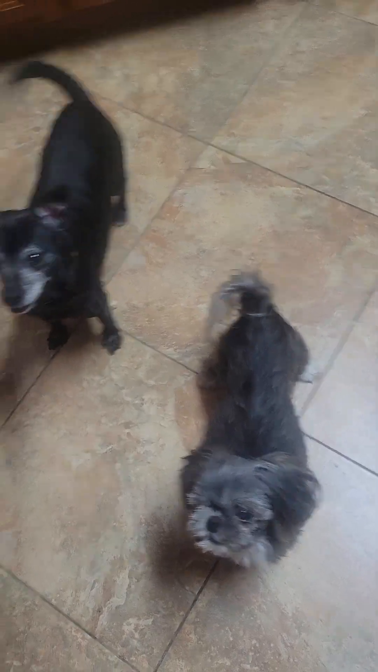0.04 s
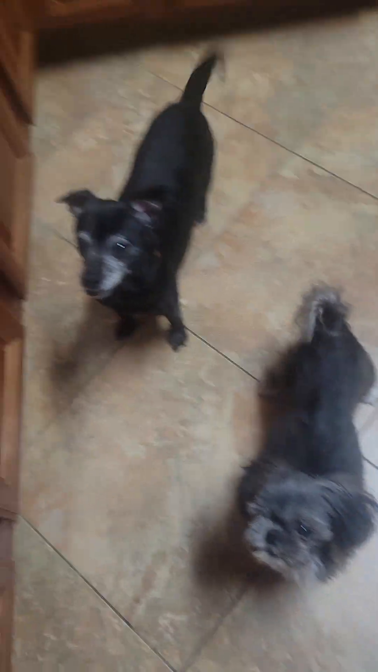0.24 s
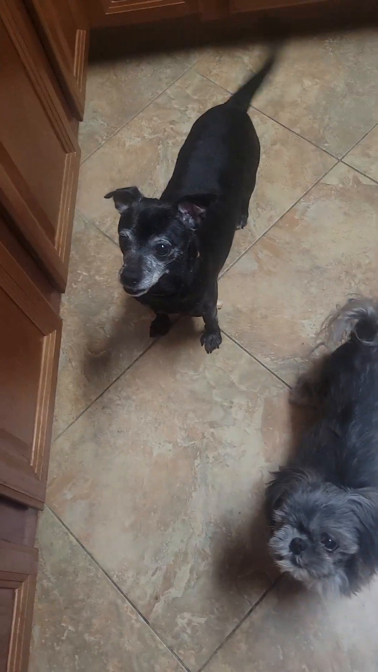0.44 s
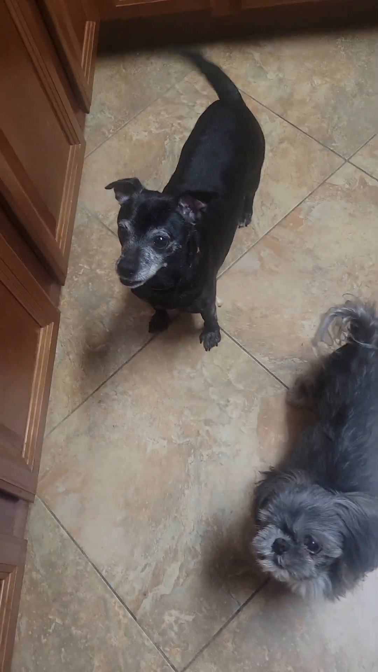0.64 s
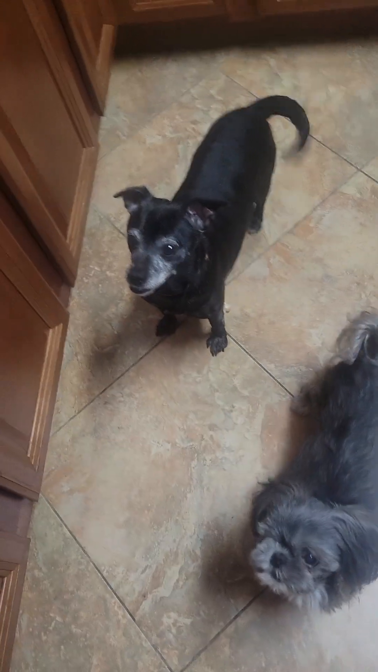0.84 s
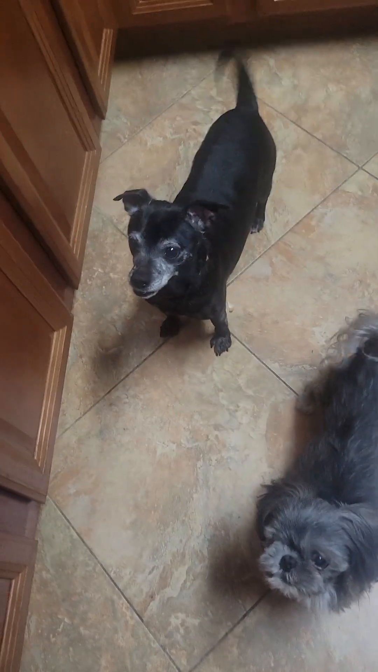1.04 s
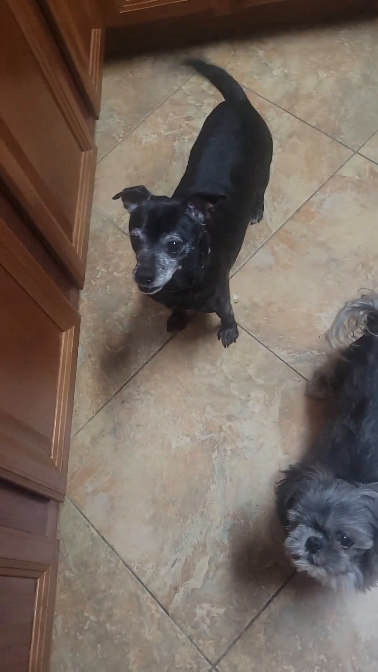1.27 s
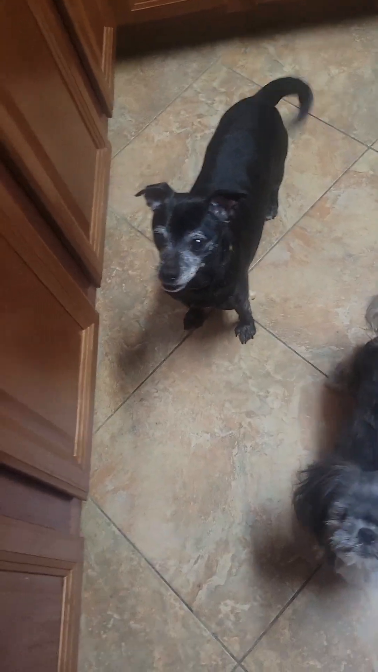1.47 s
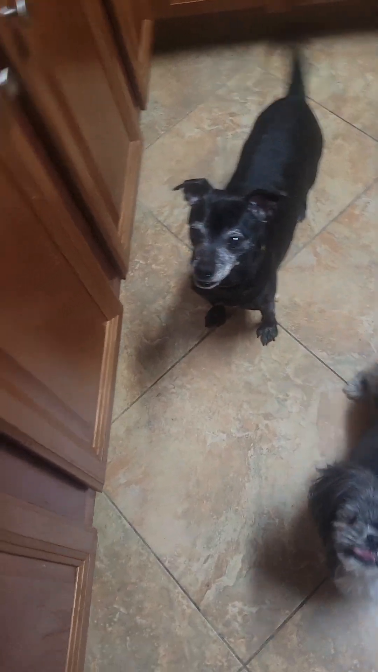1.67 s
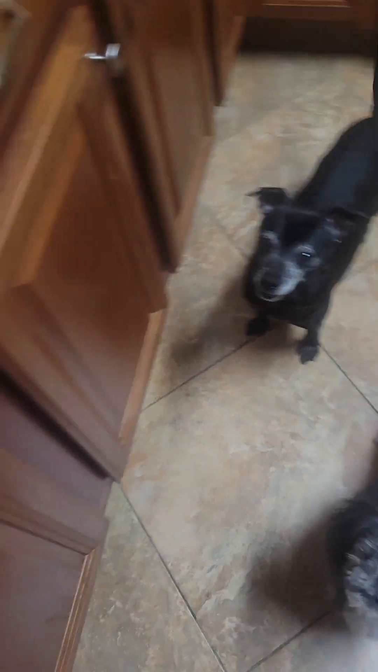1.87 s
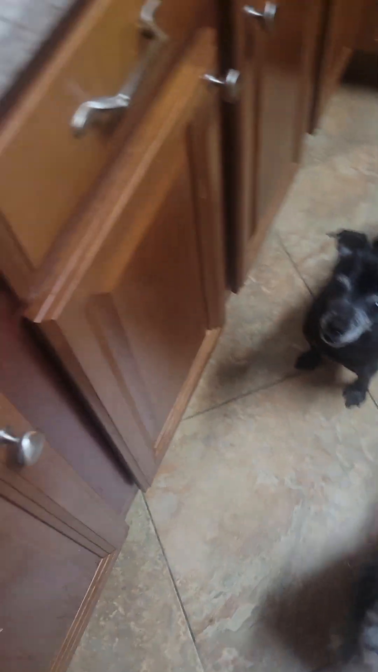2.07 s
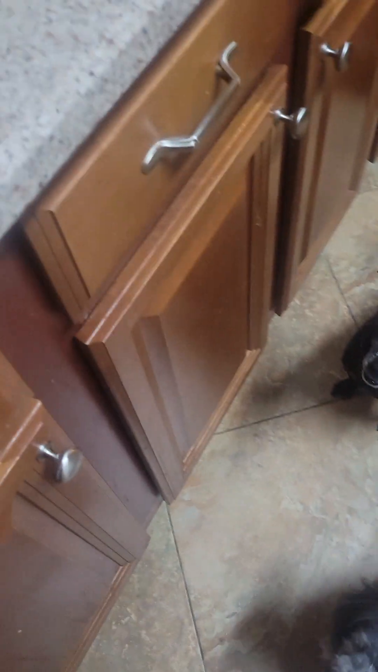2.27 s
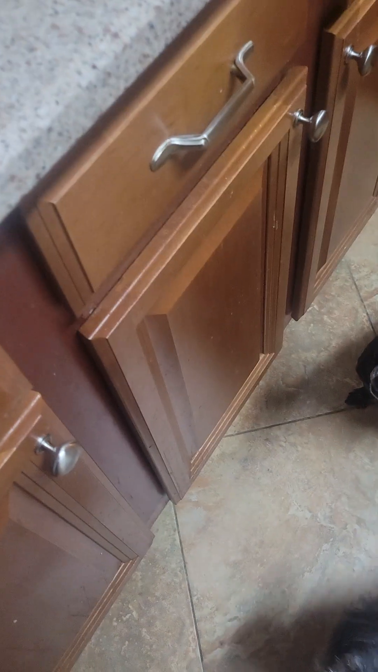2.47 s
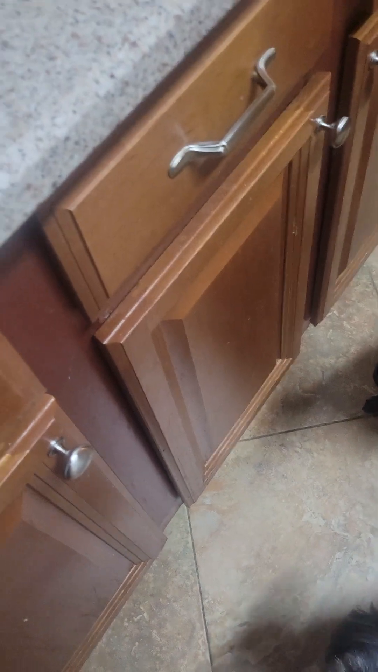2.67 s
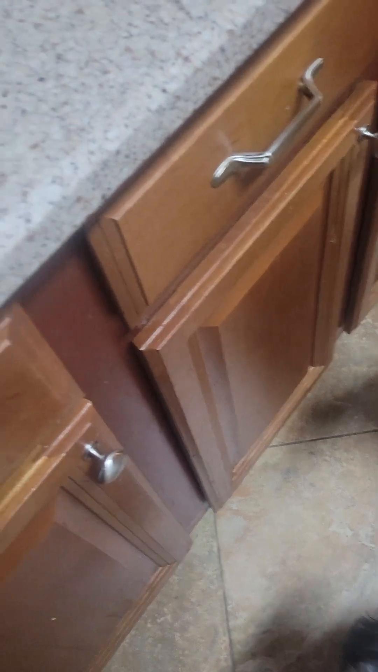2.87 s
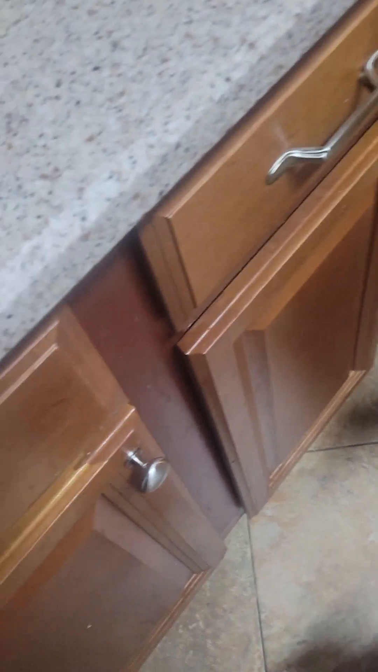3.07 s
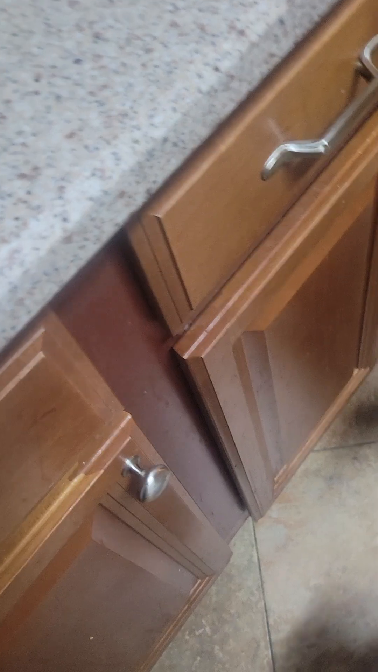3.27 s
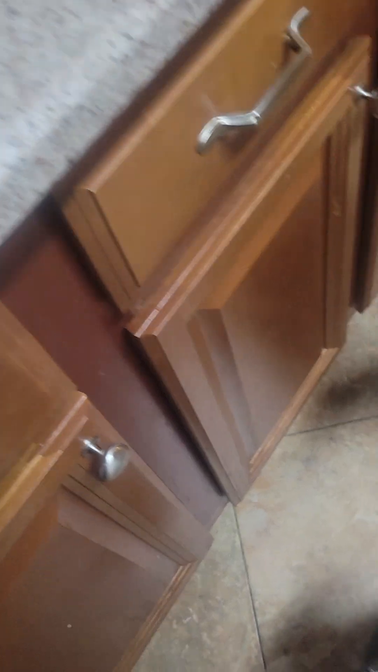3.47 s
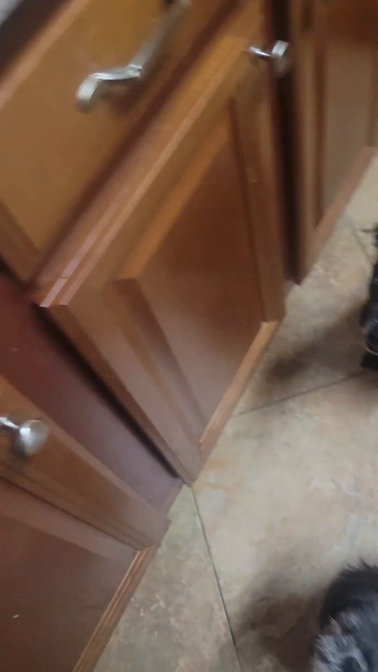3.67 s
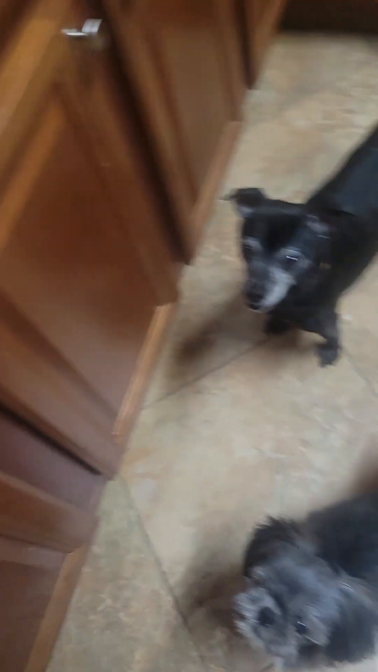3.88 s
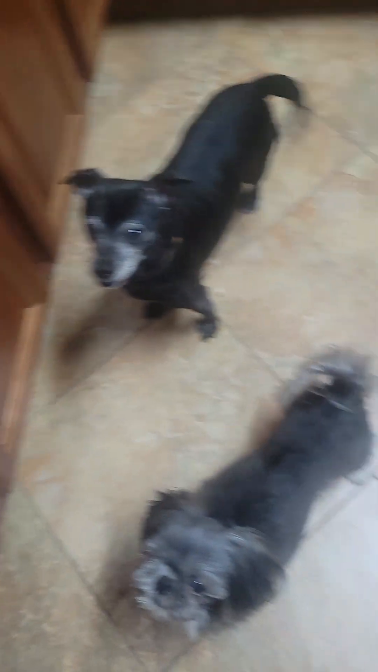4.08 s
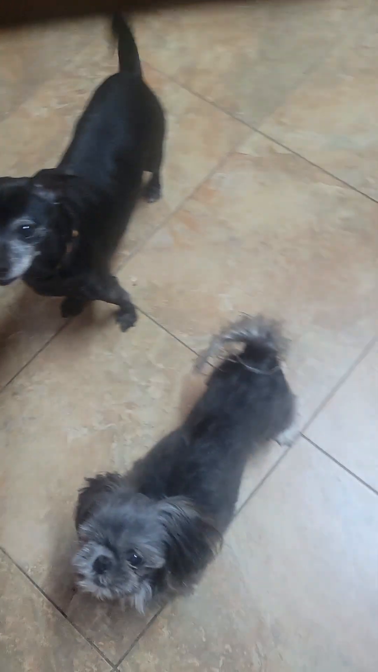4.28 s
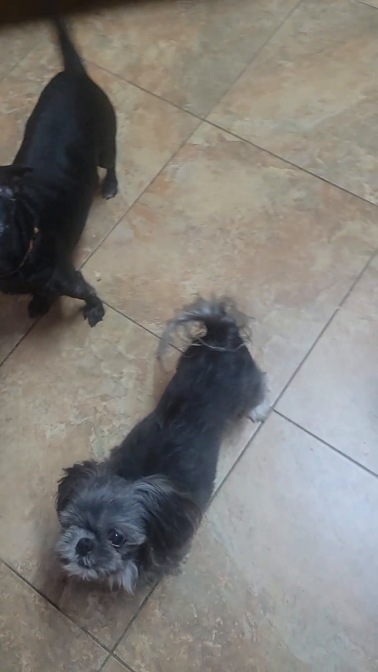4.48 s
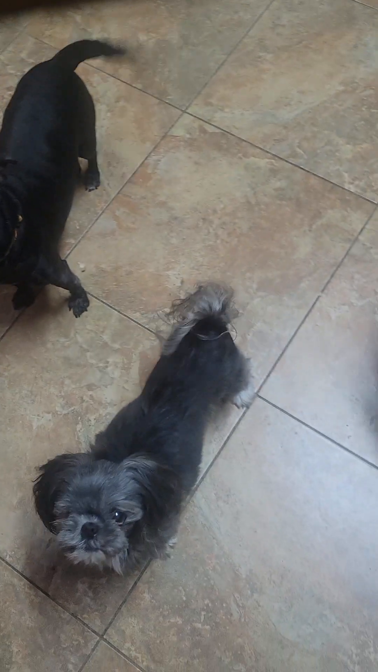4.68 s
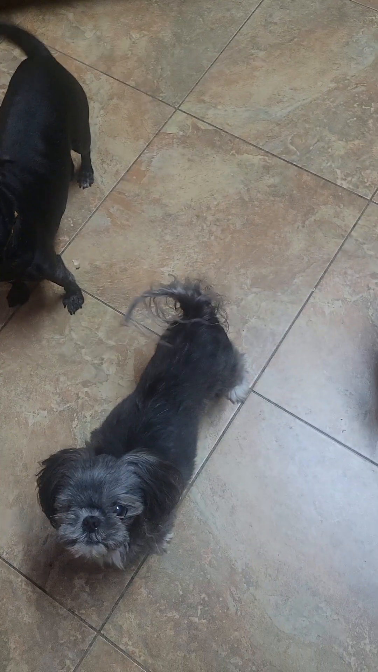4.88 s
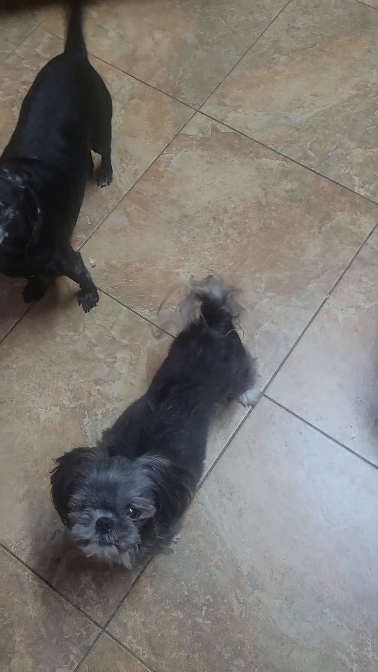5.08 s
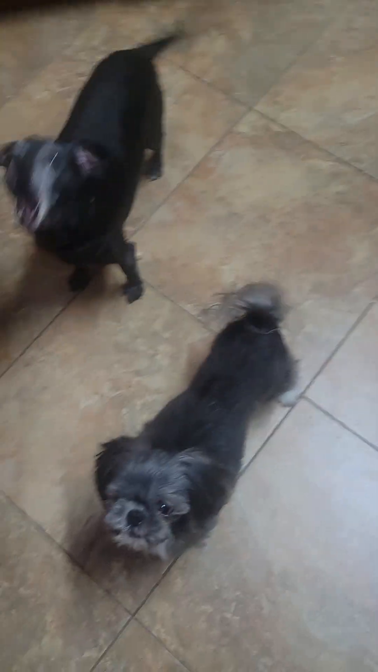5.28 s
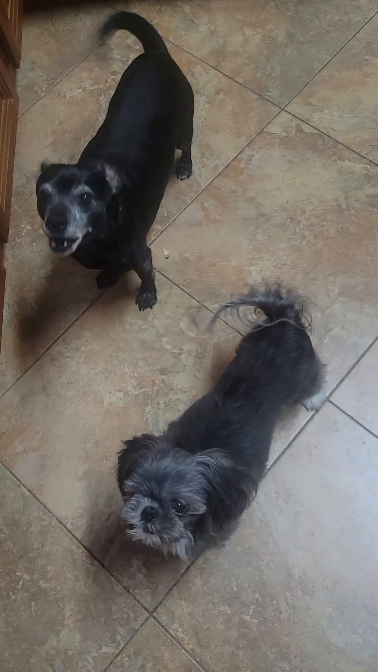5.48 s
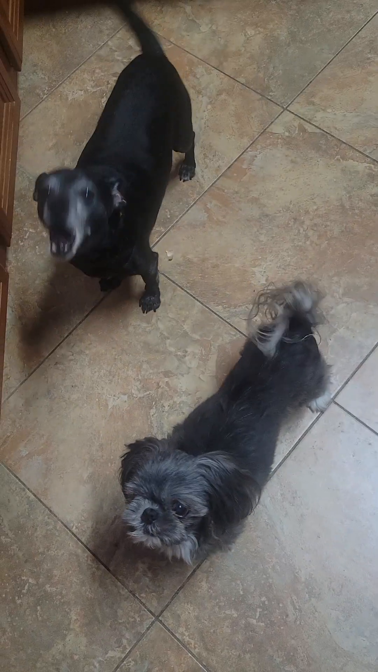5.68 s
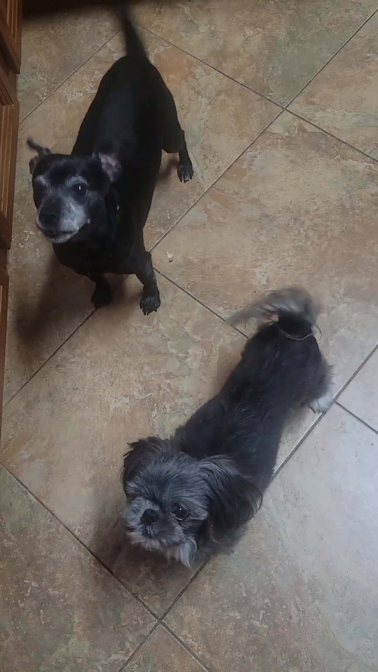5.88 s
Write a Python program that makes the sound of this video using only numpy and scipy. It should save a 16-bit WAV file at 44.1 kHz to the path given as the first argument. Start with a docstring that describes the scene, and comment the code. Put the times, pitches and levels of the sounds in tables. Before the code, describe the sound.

In a tiled kitchen, close to a phone, a soft low knock comes first, then light claw clicks scattered over a quiet hum. Around the middle paws scuffle and land in a quick flurry, with thin nasal whines and another firm patter. Near the end a small dog barks twice, short, high and rough, with a tiny gasp between and a bright room ring.

```python
"""A small dog barks twice in a tiled kitchen, close to a phone: rough voiced tones through a throat filter, with breath.
Before that, claws tick on the tiles as clicks of treble noise, something knocks softly as damped tones,
and paws scrabble and land as shaped noise. A thin nasal whine, a gliding sine, comes and goes.
Below lie an appliance hum of narrow noise bands, room hiss and a thin treble rustle."""
import sys
import numpy as np
from scipy import signal
from scipy.fft import rfft, irfft, next_fast_len
from scipy.io import wavfile
from scipy.ndimage import map_coordinates

SR = 44100
rng = np.random.default_rng(int(sys.argv[2]) if len(sys.argv) > 2 else 0)


def output_pcm(signal):
    """Save a mono or channel-first signal as 16-bit PCM at the path in sys.argv[1].

    Samples are clipped to [-1, 1] before scaling.
    """
    pcm = np.clip(np.atleast_2d(signal).T, -1, 1) * 32767
    wavfile.write(sys.argv[1], SR, np.round(pcm).astype(np.int16))


N = 261513

# The pitch and drive of each bark. One list per bark; each row: time in seconds, pitch in Hz,
# drive of the voice in dB ahead of the throat.
BARK_CONTOURS = [
    [(5.298, 895.7, -59), (5.308, 944.7, -56), (5.316, 838, -21), (5.328, 982.5, -29.5),
     (5.348, 1064, -24.5), (5.358, 913, -35), (5.372, 972, -29), (5.392, 1063, -23), (5.409, 957, -24.5),
     (5.422, 813, -25), (5.436, 540, -49.5)],
    [(5.72, 800, -47.5), (5.74, 938, -32), (5.752, 1007, -26), (5.762, 853, -24.5), (5.775, 868, -20.5),
     (5.790, 927, -29), (5.812, 1040, -23), (5.833, 1022, -22), (5.848, 821, -28), (5.861, 620, -40),
     (5.876, 488, -40)],
]
# The mix inside each bark. Each row: second tone in dB against the voice, breath at full pitch in dB against
# the drive, time before the half pitch drops out in seconds, depth of the quarter pitch (0-1),
# share of narrow-mouth breath (0-1).
BARK_BLEND = [(-1.5, 5.5, 0.0675, 0.37, 0.21), (-15, -1, 0.0308, 0.78, 0.91)]
# Throat and mouth resonances. Each row: frequency in Hz, gain in dB.
THROAT_GAIN = [(90, -39), (200, 9.5), (320, 14), (500, 9.5), (800, 12), (1150, 19), (1400, 9.5), (1950, 1),
               (2400, -24), (3100, -20.5), (6000, -32), (16000, -75)]
# Colour of breath through the open mouth. Each row: frequency in Hz, relative level in dB per Hz.
OPEN_BREATH = [(1180, -29.5), (2000, -6.5), (2690, -5), (2930, -29), (5390, -8.5), (5930, -23.5),
               (7060, -11), (7840, -19), (8850, -17.5), (9830, -24.5), (16000, -38)]
# Colour of breath through a narrower mouth. Each row: frequency in Hz, relative level in dB per Hz.
NARROW_BREATH = [(1180, -23.5), (1800, 0.5), (3300, -23), (4300, -0.5), (5000, -7), (5800, -24),
                 (6500, -10), (7700, -14.5), (8750, -11), (9830, -14.5), (16000, -25)]
HALF_CLOSED_S, CLOSE_OVER_S = 0.031, 0.064  # the mouth is half closed this long before the end; whole move
HALF_DIES_S = .008  # slope of the half pitch's drop-out
HOARSE, CLEAR = .09, .02  # roughness with the mouth open (before half pitch adds to it) and closed
SECOND_HZ, SECOND_FADES_DB = 1168, 17  # centre of the second tone, and its drop as the mouth closes
SECOND_JOINS_S, SECOND_JOIN_DB = 0.066, 18  # the second tone climbs by this much early in the bark
BREATH_DB_PER_OCTAVE, OPEN_HZ = 27, 974  # breath sinks when the pitch is below OPEN_HZ
BREATH_FADES_DB = 23  # less breath as the mouth closes


def barks():
    """Vocal folds near 1 kHz that slip into half pitch beside a second steady tone, with breath noise."""
    out, t = np.zeros(N), np.arange(N) / SR
    for rows, (second_re_db, air_db, half_s, quarter, narrow) in zip(BARK_CONTOURS, BARK_BLEND):
        start_s, joins_s, end_s = rows[0][0], rows[1][0], rows[-1][0]
        hz, voice_db, gate = curves(rows)
        closed = np.clip((t - end_s + HALF_CLOSED_S) / CLOSE_OVER_S + .5, 0, 1)
        half = np.clip(1 - (t - start_s - half_s) / HALF_DIES_S, .1, 1) * (1 - closed)
        rough = HOARSE * (1 + half) + (CLEAR - HOARSE) * closed

        not_joined = np.clip(1 - (t - joins_s) / SECOND_JOINS_S, 0, 1)
        second_db = second_re_db - SECOND_FADES_DB * closed - SECOND_JOIN_DB * not_joined
        second = amp(second_db) * np.cos(phase(SECOND_HZ * (1 + .011 * wobble(80))))

        turns = phase(hz * (1 + .12 * rough * wobble(200)))
        folds = np.zeros(N)
        for k in range(1, 10):
            octave_growth = 1 + closed * (k == 2)  # the octave grows as the mouth closes
            # soft pulses: the overtones do not peak together
            folds += octave_growth * np.cos(k * turns + .6 * k * k)
        # strong and weak cycles alternate
        folds *= 1 + 1.35 * half * np.cos(turns / 2)
        folds *= 1 + quarter * half * np.cos(turns / 4)
        # the two tones mix into a low difference tone and sidebands
        folds = folds * (1 + .5 * second) + second
        folds *= 1 + .7 * rough * wobble(400)  # uneven cycles
        voice = filtered(folds * amp(voice_db) * gate, lambda f: amp(along(THROAT_GAIN, f)))

        octaves_below = np.minimum(np.log2(hz / OPEN_HZ), 0)
        breath_db = voice_db + air_db - BREATH_FADES_DB * closed + BREATH_DB_PER_OCTAVE * octaves_below
        share = np.clip(narrow + (1 - narrow) * closed, 0, 1)
        air = np.sqrt(1 - share) * noise(OPEN_BREATH) + np.sqrt(share) * noise(NARROW_BREATH)
        out += voice + amp(breath_db + 0.64 * wobble(500)) * gate * air
    return out


# The intake between barks. One row: start in seconds, length in seconds, level in dB.
GASP_MOMENT = (5.635, 0.03, -36.5)
# Colour of the indrawn air. Each row: frequency in Hz, relative level in dB per Hz.
GASP_COLOUR = [(2000, -1), (3500, -7.5), (6500, -2.5), (9500, -8), (12000, -43)]


def gasp():
    """The dog draws air between barks: a short swell of coloured noise."""
    return swell(*GASP_MOMENT, .1, .1) * noise(GASP_COLOUR)


# Nasal whines. Each row: start in seconds, length in seconds, starting pitch in Hz, glide in Hz per second,
# starting level in dB.
WHINE_NOTES = [(3.78, .21, 1760, -100, -61), (4.22, .13, 2030, 200, -66), (4.91, .29, 2030, -430, -58.5)]
WHINE_SAGS_DB_PER_S = 18


def whines():
    """A thin, slightly unsteady whistle through the nose: a gliding sine that sags in level."""
    out = np.zeros(N)
    for s, length, start_hz, glide, db in WHINE_NOTES:
        since = np.clip(np.arange(N) / SR - s, 0, length)
        hz = (start_hz + glide * since) * (1 + .012 * wobble(120))
        level = swell(s, length, db, .15, .2) * amp(3 * wobble(60) - WHINE_SAGS_DB_PER_S * since)
        out += level * np.sin(phase(hz))
    return out


# Claws on tile. Each row: start in seconds, level in dB before the trim, mid-range in dB against the click.
CLAW_TICKS = [(0.607, -58, -20), (1.0824, -53.5, 14), (1.145, -34, -9), (1.384, -45, 1), (1.561, -47, -13),
              (1.639, -36, -35), (1.788, -57.5, 13.5), (1.818, -40, -23), (1.8498, -46, -10),
              (1.903, -63.5, 22.5), (2.0271, -36.5, -36), (2.2408, -32.5, -30), (2.283, -50, -32),
              (2.4972, -33, -39), (2.616, -53.5, 8), (2.689, -37.5, -8), (2.809, -48, 0),
              (2.9677, -33.5, -16.5), (3.154, -34.5, -16.5), (4.9248, -40, -14), (4.957, -43, 13.5),
              (5.012, -34, -26), (5.102, -54.5, 16.5), (5.6064, -36.5, 15)]
# Bright claw colour, shared with the rustle. Each row: frequency in Hz, relative level in dB per Hz.
CLAW_COLOUR = [(1470, -54), (2500, -32), (5200, -6), (8330, -3.5), (9220, -8), (11000, -4.5), (13000, -5.5),
               (16000, -8)]
SECOND_CLAW_S = 0.0077  # a second claw lands after the first


def ticks(tracks):
    """Claws strike hard tile: paired bright clicks with a short tail and a mid-range tap."""
    size = SR // 8
    t = np.arange(size) / SR
    for s, db, mid_db in CLAW_TICKS:
        first = 1.9 * dies(t, .018, .001)
        second = rng.uniform(.6, 1.6) * np.roll(dies(t, .022, .001), round(SECOND_CLAW_S * SR))
        clicks = first + second + .25 * dies(t, .13, .004)
        # the claw chatters as it slips: a new level every 60 samples
        chatter = amp(5.2 * np.repeat(rng.standard_normal(size // 60 + 1), 60)[:size])
        sharp = noise(CLAW_COLOUR, size) * clicks * chatter
        mid = noise([(250, -20.5), (600, -26.5), (3000, -23.0), (5000, -46.0)], size)
        mid *= dies(t, 0.061, 0.00068)
        add(tracks, s, amp(db - 11.0) * (sharp + amp(mid_db) * mid), -7, -9)


# Paws landing. Each row: start in seconds, level in dB before the trim, treble in dB against the slap,
# thud in dB against the slap.
PAW_LANDINGS = [(0.286, -41, -12, 11.5), (0.42, -41.5, -16.5, -6), (1.172, -49.5, -27, 3),
                (3.235, -42.5, -3.5, 7.5), (3.276, -41, 6, -4), (3.339, -22.5, -0.5, -0.5),
                (3.36, -22, -1, 1.5), (3.405, -24, 6.5, 0.5), (3.552, -29, 1.5, -10),
                (3.712, -38, -12, 4.5), (3.765, -30.5, 1.5, -30), (3.878, -33.5, -8, 1), (3.94, -37, 5, -3),
                (4.077, -41, -14, 11), (4.103, -40, -13, -3), (4.121, -34.5, -11.5, 4.5),
                (4.35, -30.5, -1.5, 3.5), (4.411, -35.5, -7.5, 4), (4.59, -19, -2.5, 2),
                (4.605, -32, 13.5, 16.5), (4.699, -26, 8.5, 8), (4.711, -33.5, 5.5, 0),
                (5.241, -37, 11, 2.5)]


def paws(tracks):
    """A paw lands: a mid-range slap, a treble snap and a slower low thud."""
    size = SR // 8
    t = np.arange(size) / SR
    for s, db, high_db, thud_db in PAW_LANDINGS:
        # a soft landing is dull as well
        edge_db, top_db = np.clip(high_db, -22, -2), np.clip(high_db - 18, -40, -20)
        slap = noise([(300, -30), (600, 0), (1500, -3), (3000, edge_db), (4500, top_db), (8000, -60)], size)
        slap *= dies(t, .07, .001)
        snap = noise([(3000, -1.5), (4700, -1.5), (8000, -9), (13000, -18.0), (16000, -11.0)], size)
        snap *= dies(t, 0.044, 0.0031) + 0.64 * dies(t, 0.011, 0.00068)
        thud = noise([(40, -17), (110, 8.5), (175, -4.0), (245, 0.5), (450, 3.5), (900, -34.0)], size)
        thud *= dies(t, 0.092, 0.017)
        landing = slap + amp(high_db) * snap + amp(thud_db) * thud
        add(tracks, s, amp(db - 3.5) * landing, -2.5, -1)


# Hollow knocks. Each row: start in seconds, level in dB before the envelope, ring in Hz,
# time to fall 60 dB in seconds, rise time constant in seconds.
HOLLOW_KNOCKS = [(.141, -18, 1230, .05, .03), (1.178, -39.5, 165, .3, .01), (1.255, -46, 175, .2, .012),
                 (.286, -26, 106, .36, .03), (1.146, -41, 1150, .04, .002), (3.335, -30, 245, .25, .008),
                 (4.585, -24, 220, .15, .006), (5.268, -33, 460, .08, .005)]


def knocks(tracks):
    """A panel rings at one main mode, blurred by noise around it."""
    t = np.arange(SR // 2) / SR
    for s, db, hz, t60, rise in HOLLOW_KNOCKS:
        # the panel's other modes blur around the main one
        modes = lambda f: (f * hz / np.abs(hz * hz - f * f + .8j * f * hz)) ** 3
        rattle = unit(filtered(rng.standard_normal(len(t)), modes))
        ring = np.sin(2 * np.pi * hz * t) + .4 * rattle
        add(tracks, s, amp(db) * dies(t, t60, rise) * ring, -1.5, -14)


# Pads dragging on tile. Each row: start in seconds, length in seconds, level in dB before grit is added.
PAD_DRAGS = [(3.248, 0.37, -46.5), (3.782, 0.12, -50), (4.232, 0.14, -64), (4.582, 0.068, -37.5),
             (4.869, 0.21, -52.5), (5.239, 0.041, -45)]
# Colour of the drag. Each row: frequency in Hz, relative level in dB per Hz.
DRAG_COLOUR = [(59, -7), (100, -3), (244, 0), (302, -1.5), (1580, -16.5), (2990, -17), (16000, -35.5)]
GRIT_PER_S, GRIT_DB = 120, -2.5  # loose taps inside the drag, level against the scrape


def scrabble(tracks):
    """Pads drag over tile: grainy noise with loose random taps inside it."""
    scrape = unit(amp(3.5 * wobble(350) + 2.5 * wobble(35)) * noise(DRAG_COLOUR))
    taps = (rng.random(N) < GRIT_PER_S / SR) * amp(4 * rng.standard_normal(N))
    tap_colour = noise([(100, -12), (300, 0), (2500, -9), (9000, -45)])
    tap_shape = dies(np.arange(SR // 2) / SR, .02, .0004)
    grit = unit(signal.fftconvolve(taps, tap_shape)[:N] * tap_colour)
    level = sum(swell(*row, 0.067, 0.55) for row in PAD_DRAGS)
    add(tracks, 0, level * (scrape + amp(GRIT_DB) * grit), -1.5, -5)


# Fur or cloth brushing past. Each row: start in seconds, length in seconds, level in dB.
BRUSH_PASSES = [(0.387, 0.017, -63), (0.92, 0.075, -68), (1.373, 0.15, -71), (1.742, 0.28, -64)]


def brushing(tracks):
    """Fur or cloth brushes past: soft noise with an uneven grain."""
    grain = amp(5 * wobble(250) + 4.5 * wobble(45))
    brush = unit(grain * noise([(300, -3.0), (1500, 0.5), (3200, -1.0), (5000, -13.5), (9000, -18.0)]))
    add(tracks, 0, sum(swell(*row, 0.15, 0.3) for row in BRUSH_PASSES) * brush, -3, -3)


def feet():
    """Left, right and room-send tracks of claws, paws, knocks, dragging pads and brushing."""
    tracks = np.zeros((3, N + SR))
    for layer in (ticks, paws, knocks, scrabble, brushing):
        layer(tracks)
    return tracks[:, :N]


# How long the room rings. Each row: frequency in Hz, time to fall 60 dB in seconds.
KITCHEN_T60 = [(100, 0.79), (500, 0.47), (1000, 0.91), (2500, 0.46), (6000, 0.54), (14000, 0.24)]
# Colour of the room's answer. Each row: frequency in Hz, relative level in dB.
WALL_COLOUR = [(500, -2), (2000, 2)]


def kitchen(x, piece_s, count=10):
    """The room's answer: noise tails whose frequencies die at their own speeds, shared out over the sound."""
    out, place = np.zeros((2, N)), np.arange(N) / SR / piece_s
    for k in range(count):
        hz, t, z = signal.stft(pair(WALL_COLOUR, SR * 3 // 4), SR, nperseg=256)
        decay = amp(-60 * t / along(KITCHEN_T60, hz)[:, None])
        tail = signal.istft(z * decay, SR, nperseg=256)[1]
        # overlapping pieces of the sound take turns among the tails
        piece = np.sin(np.pi / 2 * np.clip((place - k) % count, 0, 2))
        out[:, 200:] += signal.fftconvolve((x * piece)[None], tail / 60, axes=1)[:, :N - 200]
    return out


# Waves that linger between the hard walls. Each row: frequency in Hz, relative level in dB,
# time to fall 60 dB in seconds.
ROOM_MODES = [(950, -9, .3), (1036, -6, .35), (1098, -5, .3), (1164, -3, .45)]


def standing(x):
    """Room modes that the bark leaves ringing, a little out of step at the two ports."""
    shift = np.exp(1j * rng.normal(0, 1.0, (len(ROOM_MODES), 2, 1)))

    def response(f):
        total = 0
        for turn, (centre, db, t60) in zip(shift, ROOM_MODES):
            width = np.log(1000) / np.pi / t60
            mode = 1j * f * width / (centre * centre - f * f + 1j * f * width)
            total = total + turn * amp(db) * mode
        return total
    return filtered(x, response)


# Wavering appliance tones. Each row: centre in Hz, width in Hz, mean level in dB.
HUM_TONES = [(58, 16, -58.5), (245, 14, -79), (348, 18, -74.5)]


def appliance():
    """An appliance hums: narrow bands of noise make fuzzy, wavering tones."""
    out = np.zeros(N)
    for hz, width, db in HUM_TONES:
        tone = filtered(rng.standard_normal(N), lambda f: 1 / (1 + ((f - hz) / width * 2) ** 4))
        out += amp(db + 0.69 * wobble(5.04)) * unit(tone)
    return out


# Level of the thin rustle. Each row: time in seconds, level in dB around which it wavers.
RUSTLE_LEVEL = [(0, -88), (1.9, -70.5), (4.1, -83), (5.4, -57), (5.93, -61)]


def rustle():
    """A thin treble rustle: bright noise that swells and flickers."""
    return amp(curves(RUSTLE_LEVEL)[0] + 1.5 * wobble(42) + 1.2 * wobble(7)) * pair(CLAW_COLOUR, N)


# Colour of the room hiss. Each row: frequency in Hz, relative level in dB per Hz.
HISS_COLOUR = [(35, -5), (90, 4.5), (200, -7), (420, -15), (900, -18), (1800, -21.5), (6300, -28.5),
               (8500, -39.5), (16000, -63)]
HISS_DB = -64.5


def hiss():
    """Room hiss: wide, mostly low noise with a gently wavering level."""
    return amp(HISS_DB + wobble(2) + wobble(12)) * pair(HISS_COLOUR, N)


def amp(db):
    """Decibels to gain."""
    return 10 ** (np.asarray(db) / 20)


def unit(x):
    """x brought to rms 1."""
    return x / np.sqrt(np.mean(x ** 2) + 1e-20)


def phase(hz):
    """Running phase in radians of a moving pitch."""
    return 2 * np.pi * np.cumsum(hz) / SR


def along(points, hz):
    """(Hz, value) points read on a log frequency axis."""
    f, v = np.transpose(points)
    return np.interp(np.log(hz + 1), np.log(f + 1), v)


def curves(rows):
    """One value per sample for each column after the time, and a gate that is open while the rows last."""
    s, *cols = np.transpose(rows)
    t = np.arange(N) / SR
    gate = np.clip(np.minimum(t - s[0], s[-1] - t) / 0.0023, 0, 1)
    return [np.interp(t, s, c) for c in cols] + [gate]


def wobble(rate):
    """A smooth random curve, rate knots a second."""
    return map_coordinates(rng.standard_normal(int(N * rate / SR) + 4), [np.arange(N) * rate / SR])


def swell(s, length, db, rise, fall):
    """A gain that climbs 60 dB in rise s, holds for the length and drops 60 dB in fall s."""
    t = np.arange(N) / SR - s
    return amp(db - 60 * np.maximum(0, np.maximum(-t / rise, (t - length) / fall)))


def dies(t, t60, rise):
    """A struck envelope: a fast rise, then a fall of 60 dB in t60 s."""
    return amp(-60 * t / t60) * (1 - np.exp(-t / rise))


def filtered(x, response):
    """x times a complex response of frequency, padded so that its tail does not wrap early."""
    m = next_fast_len(x.shape[-1] + min(x.shape[-1], SR))
    return irfft(rfft(x, m) * response(np.fft.rfftfreq(m, 1 / SR)), m)[..., :x.shape[-1]]


def noise(spectrum, size=N):
    """Coloured noise of rms 1."""
    return unit(filtered(rng.standard_normal(size), lambda hz: amp(along(spectrum, hz))))


# Left-right likeness of wide noise. Each row: frequency in Hz, correlation (0-1).
LIKENESS = [(60, .995), (250, .97), (600, .4), (1500, .12), (12000, .06)]


def pair(spectrum, size):
    """Two noises, alike in the bass and nearly unrelated in the treble."""
    def response(hz):
        turn = np.arccos(np.clip(along(LIKENESS, hz), -1, 1)) / 2
        return amp(along(spectrum, hz)) * [np.cos(turn), np.sin(turn)]
    mid, side = filtered(rng.standard_normal((2, size)), response)
    return unit(np.array([mid + side, mid - side]))


def ports(x, balance_db, lead_s):
    """The sound at two microphone ports: a level difference and the left one ahead by lead_s."""
    side = np.array([[.5], [-.5]])
    return filtered(x, lambda hz: amp(side * balance_db(hz)) * np.exp(2j * np.pi * hz * side * lead_s))


def add(tracks, s, sound, pan_db, wet_db):
    """Puts a sound at time s on the left, right and room-send tracks."""
    tracks[:, round(s * SR):][:, :len(sound)] += sound * amp([[pan_db / 2], [-pan_db / 2], [wet_db]])


# The barking dog at the two ports. Each row: frequency in Hz, left over right in dB.
DOG_BALANCE = [(380, -1), (700, -7), (1300, -1), (2400, 1.5), (8000, 4)]
AWAY_HZ = 4500  # the dog sends less to the walls above this
BARK_PIECE_S, STEP_PIECE_S = .09, .007  # spacing of the pieces that share one room tail
FAR_WALL_S, FAR_WALL_DB = 0.04, -17  # one clear echo of the bark


def scene():
    """Direct sounds, two bark reflections, the room's answer and the background."""
    bark, whine = barks() + gasp(), whines()
    left, right, steps = feet()
    balance = lambda hz: along(DOG_BALANCE, hz)

    near = np.array([np.roll(left, 10), right])  # the left port hears the feet 10 samples later
    direct = ports(bark, balance, 0.0003274) + near + whine
    # the first bounce off the tiles, 236 samples late
    direct += amp(-7.0) * np.roll(ports(bark, balance, -0.00011), 236, axis=1)
    far_wall = ports(bark, np.zeros_like, 0.00027)
    direct += amp(FAR_WALL_DB) * np.roll(far_wall, round(FAR_WALL_S * SR), axis=1)

    bark_send = amp(-3.5) * filtered(bark, lambda hz: 1 / (1 + 1j * hz / AWAY_HZ))
    room = kitchen(bark_send + amp(-8) * whine, BARK_PIECE_S)
    room += kitchen(amp(3.5) * steps, STEP_PIECE_S)
    room += amp([[6.5], [8.5]]) * standing(bark)
    return direct + room + appliance() + rustle() + hiss()


TOP_HZ = 15900  # the phone's band limit


def record(dry):
    """The phone rounds off the highest peaks, thins the deep bass and keeps nothing above its band limit."""
    rounded = dry / (1 + np.abs(dry / .98) ** 6) ** (1 / 6)
    return filtered(rounded, lambda hz: (hz < TOP_HZ) / (1 + (40 / (hz + 1)) ** 4))


dry = scene()
out = record(dry)
output_pcm(out)
```